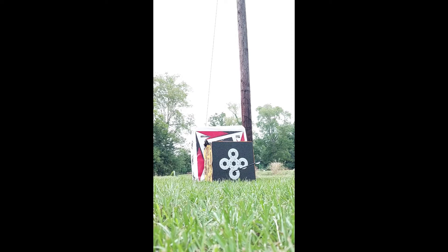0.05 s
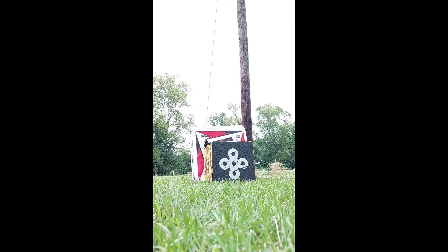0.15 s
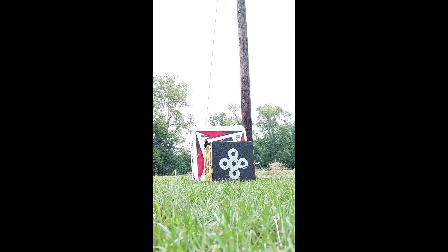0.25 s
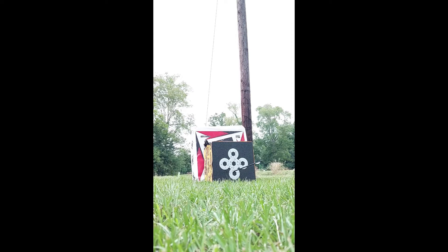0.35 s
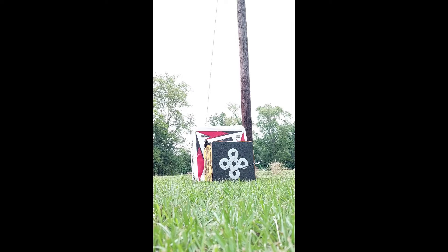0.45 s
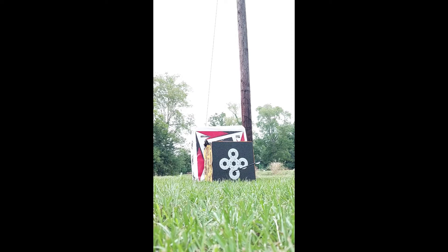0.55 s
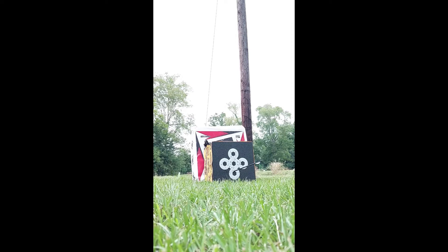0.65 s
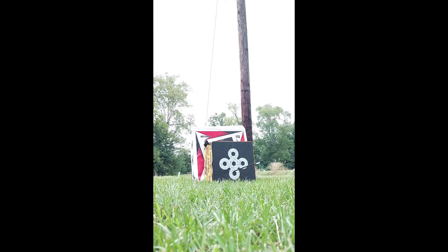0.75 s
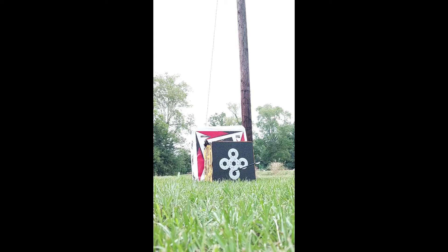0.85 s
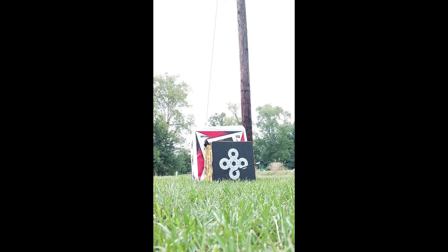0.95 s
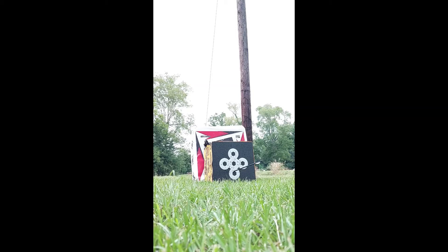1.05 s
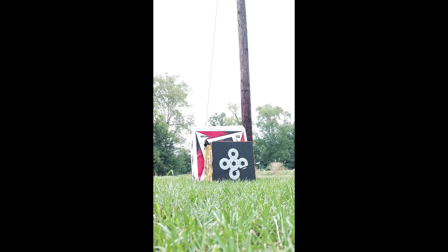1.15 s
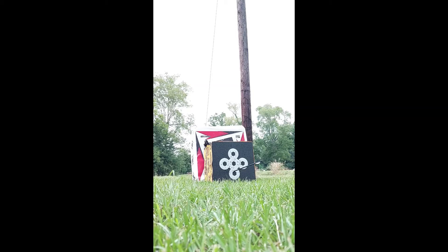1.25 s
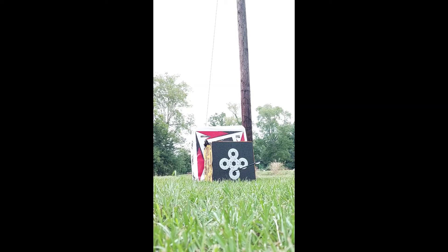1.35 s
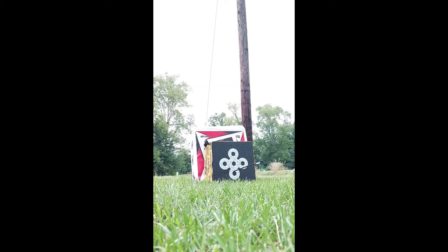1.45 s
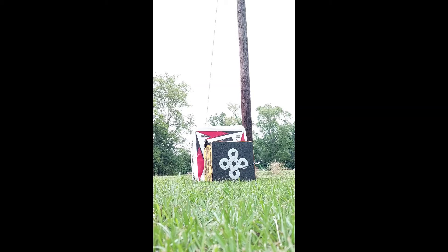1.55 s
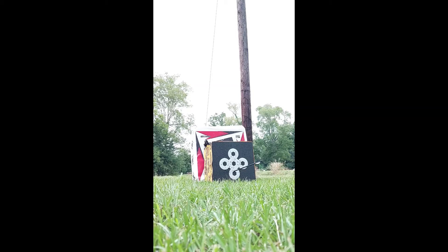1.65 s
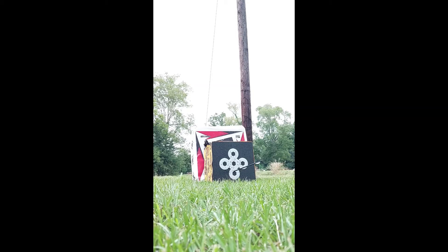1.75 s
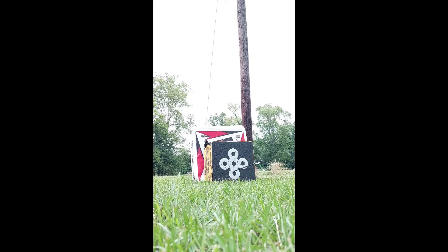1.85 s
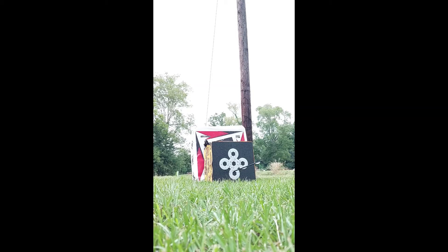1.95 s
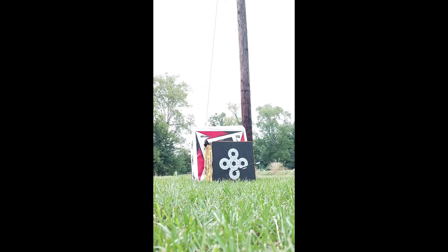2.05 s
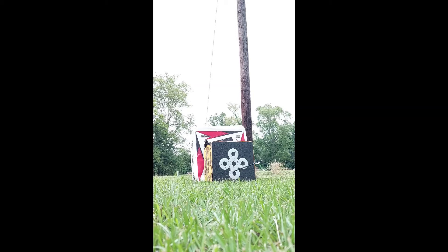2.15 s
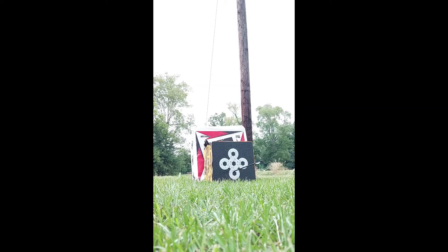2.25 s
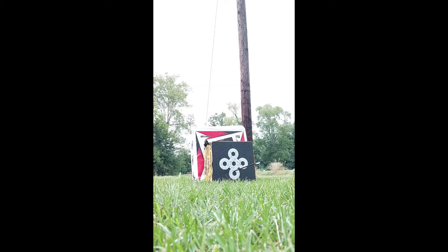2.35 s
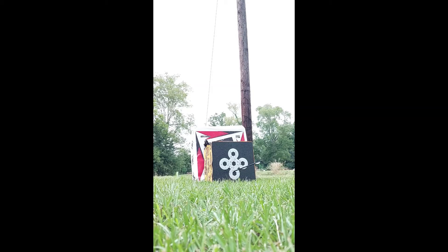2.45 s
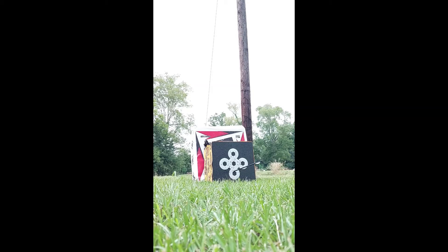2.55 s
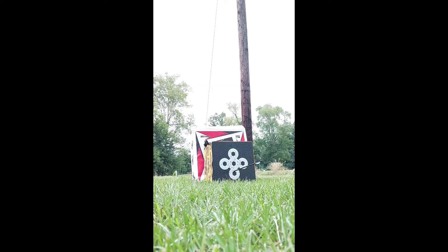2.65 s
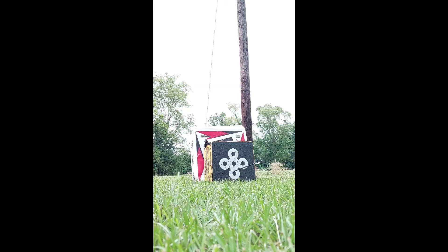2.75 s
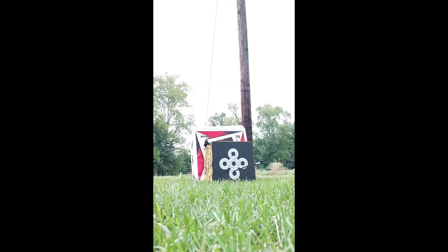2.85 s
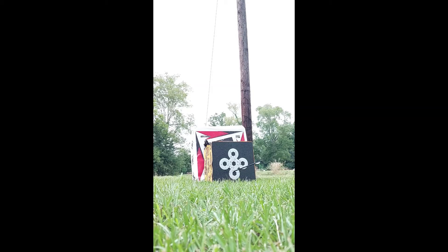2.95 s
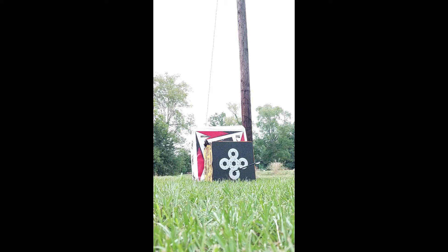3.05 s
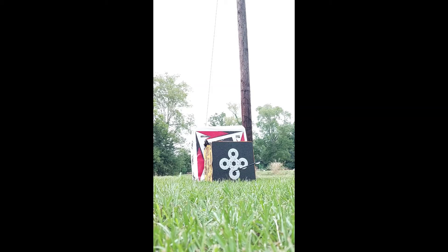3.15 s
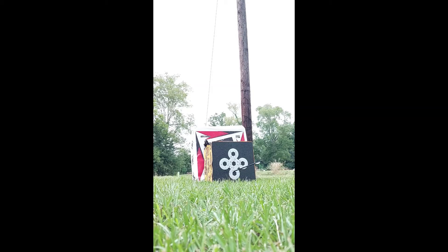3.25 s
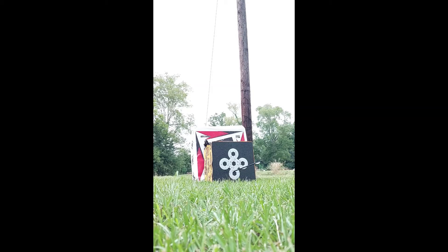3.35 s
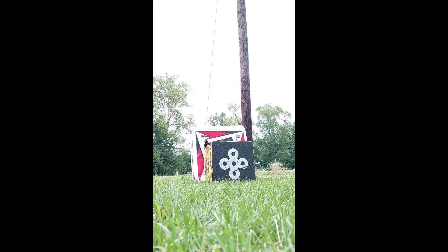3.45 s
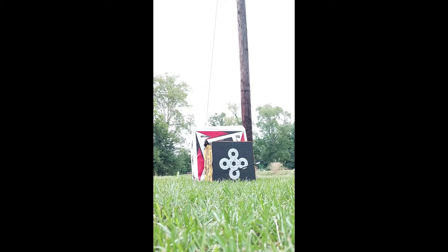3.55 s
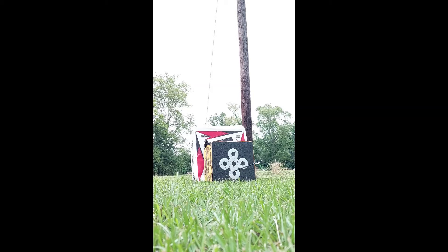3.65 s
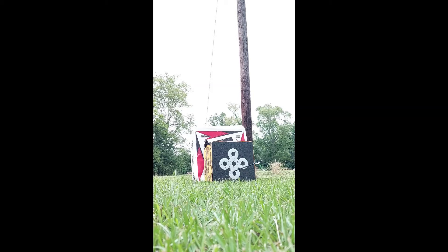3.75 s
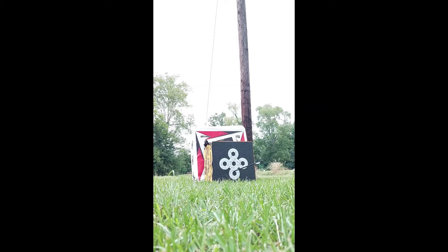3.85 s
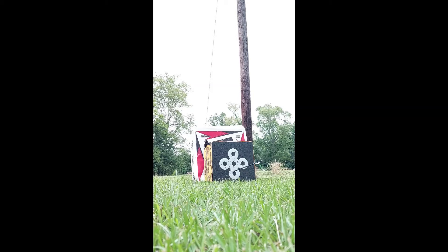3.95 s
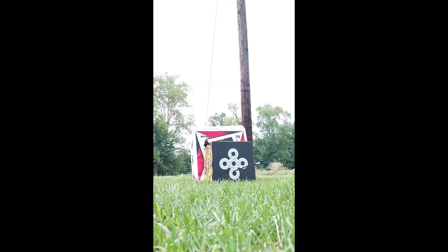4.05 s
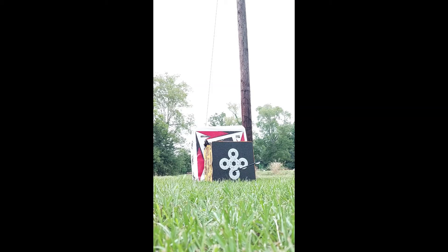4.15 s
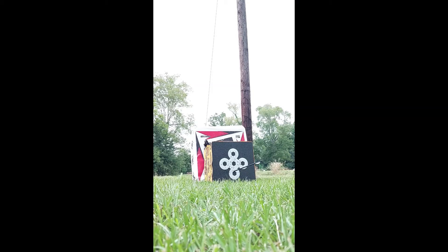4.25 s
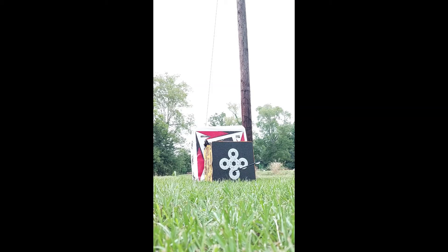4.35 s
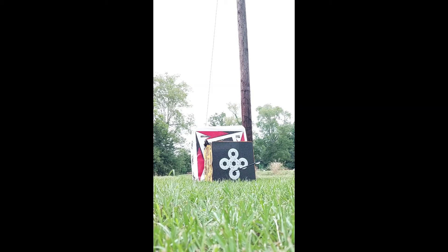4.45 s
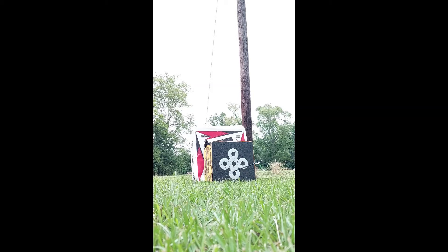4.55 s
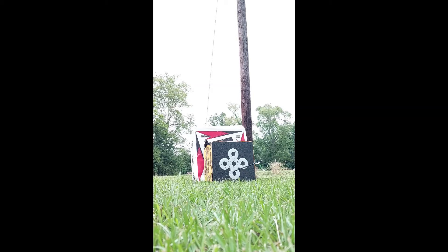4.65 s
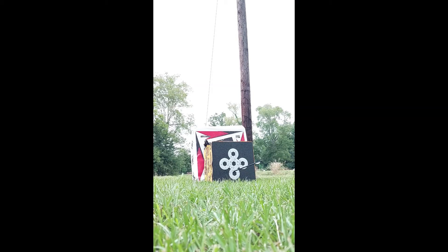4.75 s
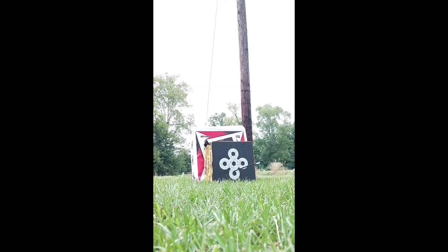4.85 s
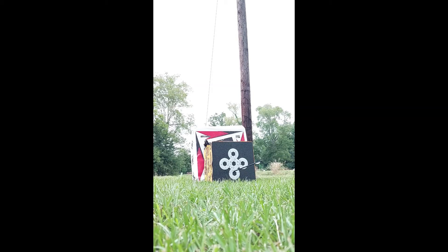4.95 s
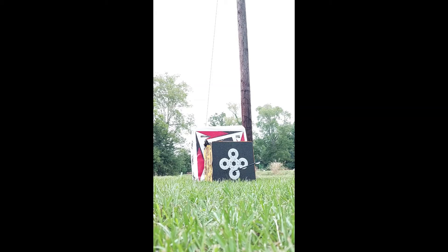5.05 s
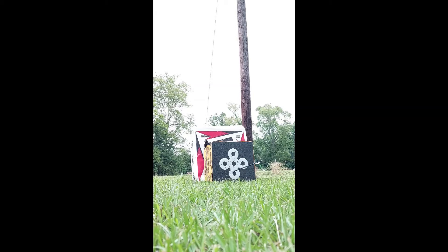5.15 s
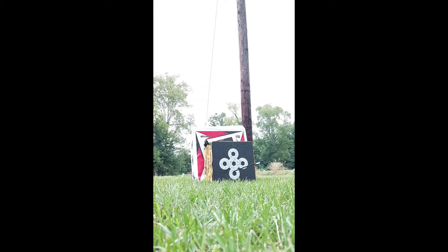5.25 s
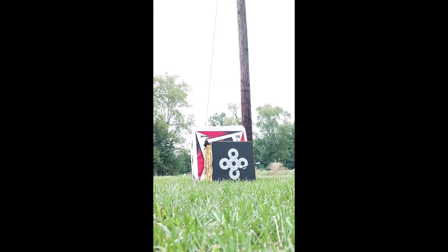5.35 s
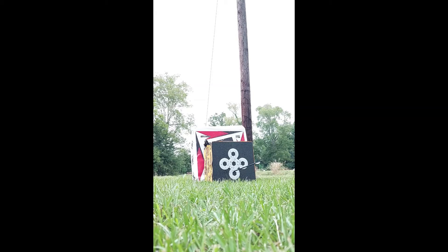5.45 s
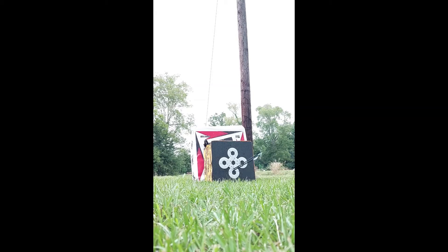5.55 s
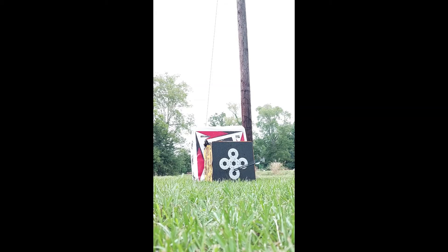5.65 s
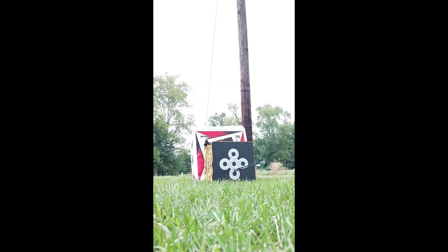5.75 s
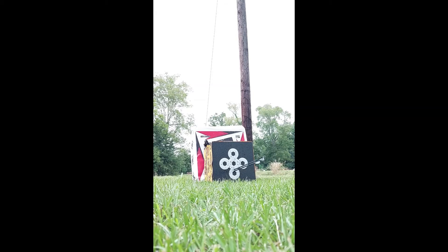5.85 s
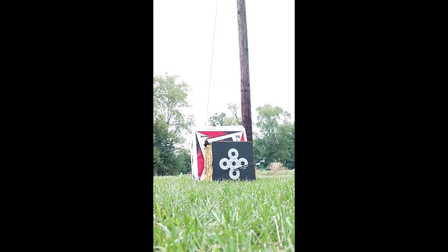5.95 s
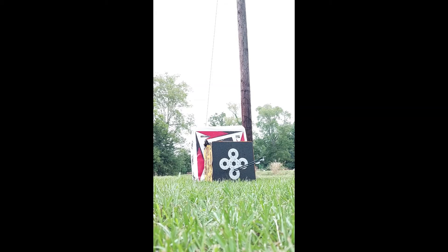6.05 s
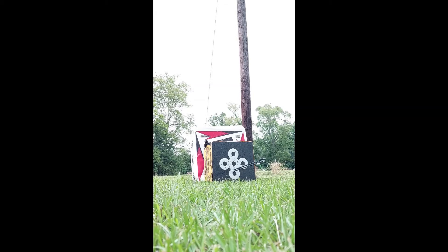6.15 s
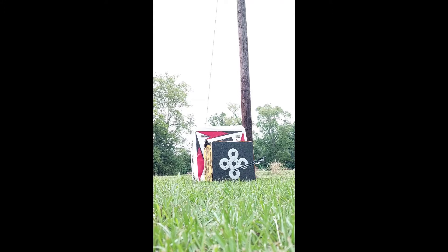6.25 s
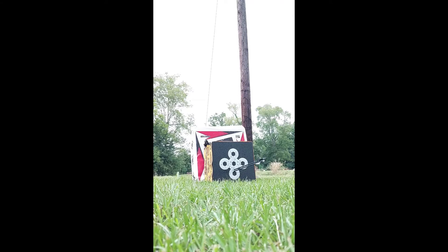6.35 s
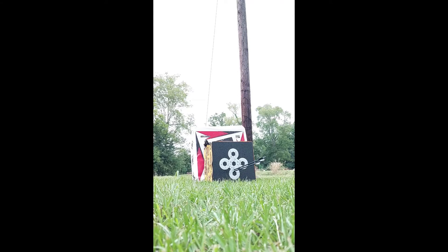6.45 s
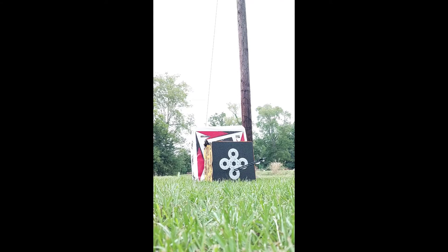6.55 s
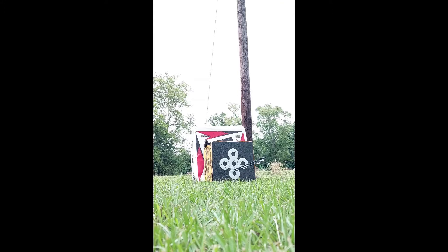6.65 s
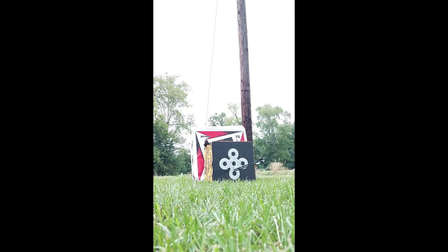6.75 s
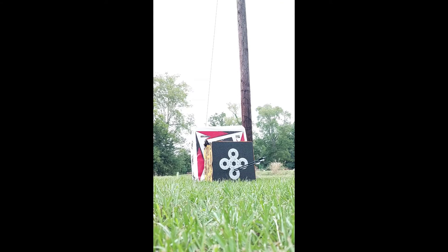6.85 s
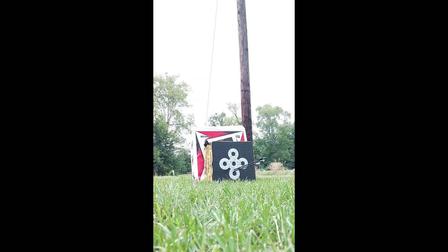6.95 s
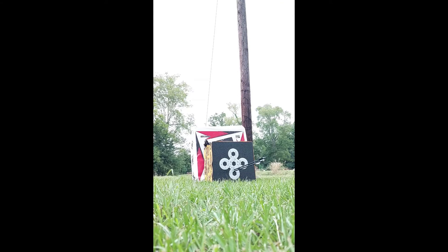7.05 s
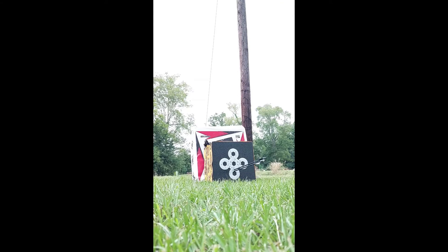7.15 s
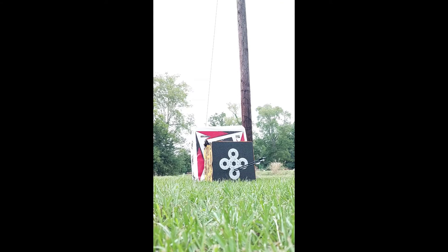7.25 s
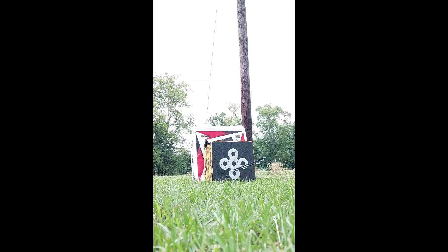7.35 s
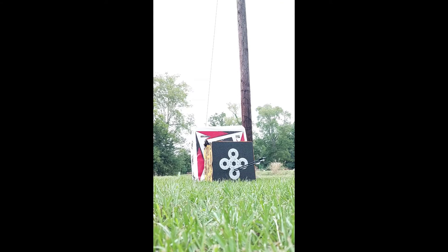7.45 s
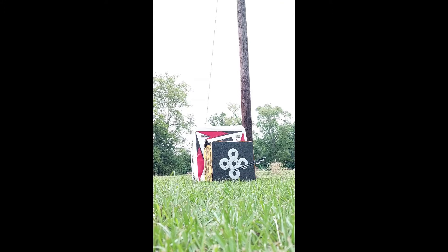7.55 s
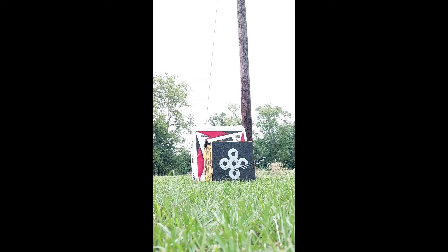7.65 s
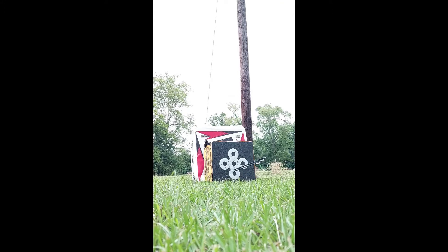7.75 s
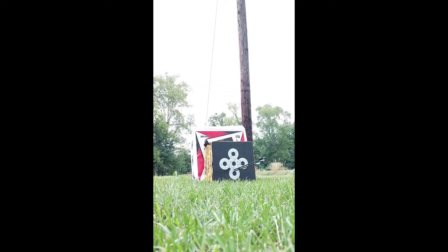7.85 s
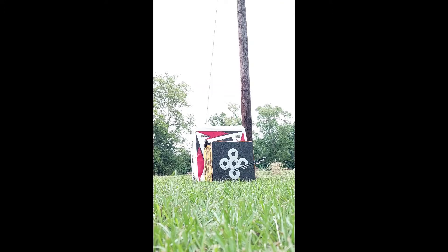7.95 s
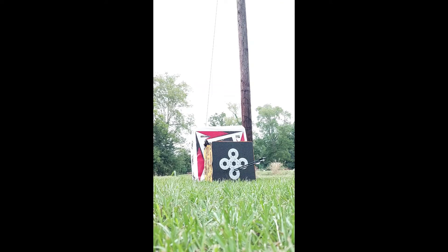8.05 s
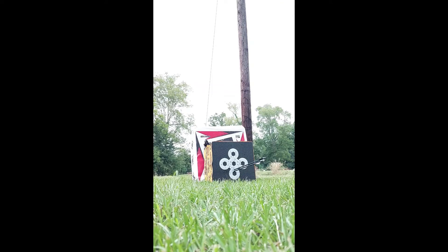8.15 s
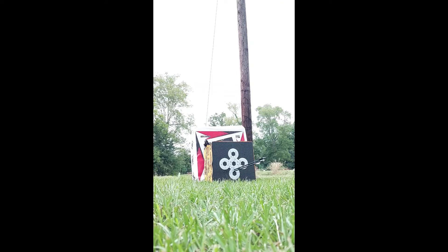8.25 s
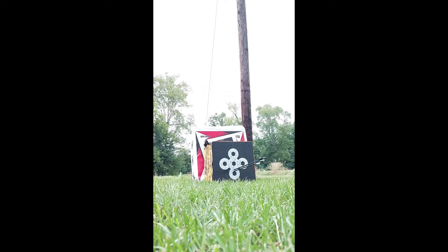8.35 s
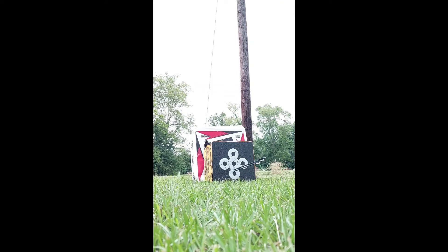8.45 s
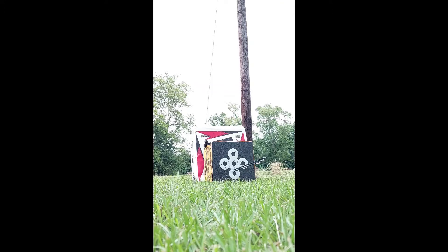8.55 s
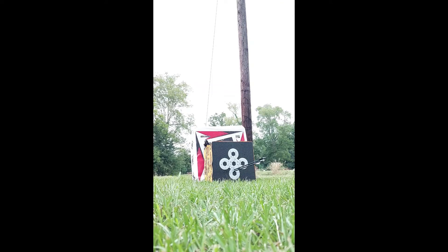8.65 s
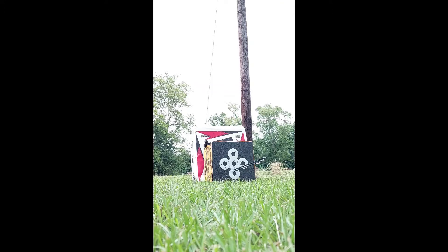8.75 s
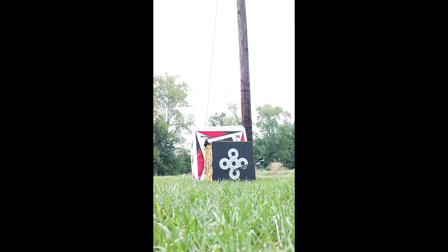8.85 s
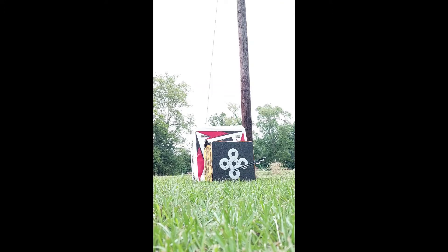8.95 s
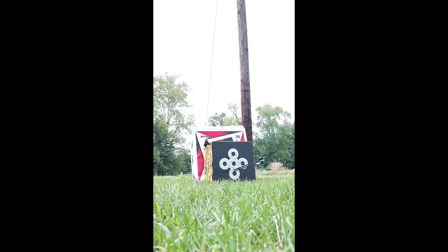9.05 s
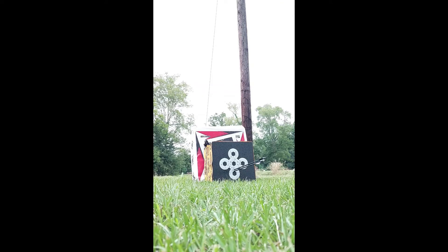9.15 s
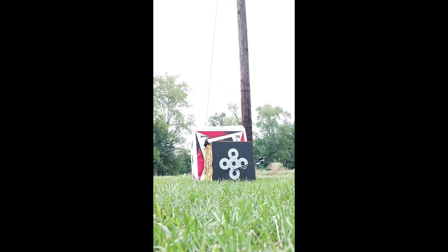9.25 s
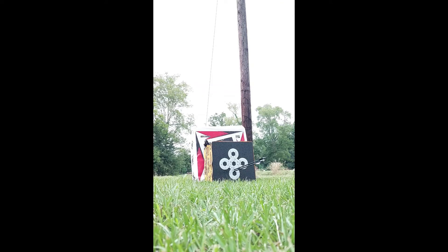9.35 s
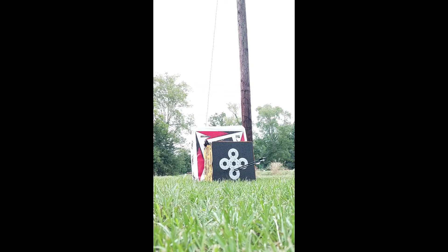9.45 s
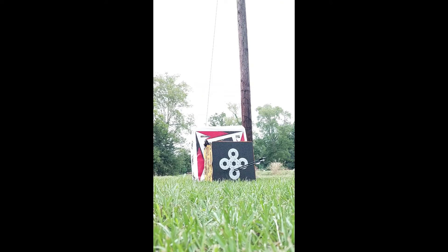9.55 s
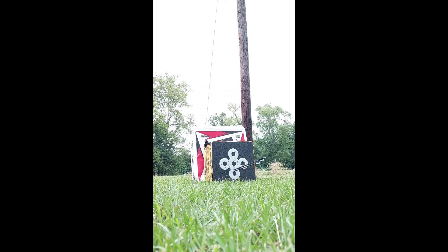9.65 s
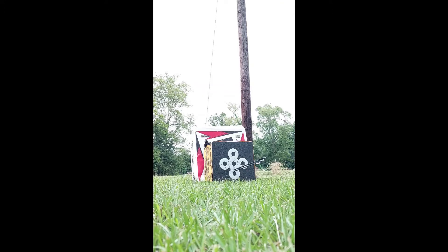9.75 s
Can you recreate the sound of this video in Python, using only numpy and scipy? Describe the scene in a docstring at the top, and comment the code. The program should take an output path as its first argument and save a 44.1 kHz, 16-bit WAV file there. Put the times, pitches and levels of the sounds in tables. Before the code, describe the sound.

A summer lawn, heard by a phone close to a foam target. Throughout, distant machines make a low, slightly throbbing hum and rumble beneath an even, high cicada sizzle, thicker on the left, with wavering insect trills and a faint road to the right. A nearer cicada gives short, buzzy, downward-sliding pulses roughly every second from the start, gradually closer together until about 7; a fainter, farther one answers in the first three seconds. Tiny thin chirps dot the trees. At 2.9 a hoarse, fluttering bird call flicks upward. At 5.36 a soft bowstring puff, then a swift swelling hiss, and at 5.58 one very loud, sharp smack: bright crack, tearing foam, brief hollow thud and faint dull wash. The background instantly ducks, stays low for over a second, then climbs back. The bird calls again at 9.1, followed by two small cicada buzzes from 9.4.

```python
"""Distant machines hum and throb on a summer lawn, under a cicada chorus made of shaped noise and wavering tones.
From the start one nearer cicada buzzes in pulses built from click harmonics; early on, a farther one answers.
A bird gives a hoarse, fluttering call at about 3 s. Then a bowstring puffs and an arrow hisses in as swelling noise.
It smacks into a foam target close to a phone in the grass: dying tones for the block and shaft, noise for the tear.
The phone's gain control ducks everything for more than a second; near the end the bird calls again."""
import sys
import numpy as np
from scipy import signal
from scipy.fft import rfft, irfft, next_fast_len
from scipy.io import wavfile
from scipy.ndimage import uniform_filter1d, minimum_filter1d

SR = 44100
rng = np.random.default_rng(int(sys.argv[2]) if len(sys.argv) > 2 else 0)


def generate_wav(sig):
    """Save sig (samples, or channels by samples) to the path in sys.argv[1] as 16-bit PCM at SR."""
    pcm = np.round(np.clip(np.atleast_2d(sig).T, -1, 1) * 32767).astype(np.int16)
    wavfile.write(sys.argv[1], SR, pcm)


N = 431738
T = np.arange(N) / SR  # time of every sample, in s

# The foam block's ringing tones: pitch_hz, level_db, build_up_s, t60_s (time to fall by 60 dB)
FOAM_TONES = [(189.0, -13.1, 0.0151, 0.0404), (221.5, -22.1, 0.023, 0.1341), (244.4, -3.9, 0.0095, 0.081),
              (269.3, -15.8, 0.0304, 0.18), (282.9, -21.0, 0.033, 0.1612), (311.8, 0, 0.0128, 0.0065),
              (330.2, -12.0, 0.0053, 0.13), (352.4, -4, 0.0217, 0.0108), (382.9, -24.9, 0.0075, 0.1972),
              (434, -21, 0.0026, 0.0284), (617, 3, 0.0011, 0.0042), (830, -4.5, 0.00042, 0.0025)]
# Cracks of the point and shaft going in: pitch_hz, level_db, build_up_s, t60_s, left_minus_right_db
SHAFT_CRACKS = [(980, -12.5, .0007, .008, 3), (2863, -4, 0.00033, 0.0066, 6),
                (4400, -11, 0.00051, 0.003, 12), (5940, -13, .0014, 0.0053, 9.5),
                (6760, -14, .0014, 0.0039, 10.5), (9040, -27, .0005, .0033, 7),
                (10700, -23, 0.00074, 0.003, 10), (12660, -25, .001, .0025, 4)]
# Spectrum of foam tearing and rubbing along the shaft: frequency_hz, relative_level_db
TEAR_SPECTRUM = [(300, -10), (520, -8), (1000, -4), (1450, -19), (2700, -14.5), (4500, -26), (5250, -26),
                 (6400, -23), (8100, -33), (10300, -31), (15000, -33)]
# Buzzes of the nearer cicada, mostly coming sooner and higher:
# start_s, level_db, length_s, click_rate_hz, upper_resonance_db
CICADA_BUZZES = [(-.012, -46, 0.15, 376, 0), (1.022, -44, .14, 377, -11), (2.018, -43, .135, 378, -1),
                 (2.975, -42.5, .12, 378.6, -1), (3.893, -43.5, .135, 381, -3),
                 (4.74, -41.5, .12, 381.9, -5), (5.522, -45, 0.12, 382.5, -4),
                 (6.272, -44.5, .1, 383.3, -10), (7.038, -46, .1, 383, -10), (9.447, -45.5, .065, 390, -10),
                 (9.652, -47, .16, 392, -7)]
# Answers of the farther cicada: middle_s, level_db, half_length_s
CICADA_ANSWERS = [(.32, -57, .13), (1.215, -54, .05), (2.18, -55, .04), (3.11, -54, .04)]
# Harmonics heard in the answers: multiple_of_click_rate, level_db
ANSWER_HARMONICS = [(12, -5), (13, -4), (15, 0)]
# Bird calls: start_s, level_db, lower_harmonic_db, effort_outside_accent (share)
BIRD_CALLS = [(2.915, -51, -7, .9), (9.136, -45, -9, .55)]
# Short thin notes in the trees: middle_s, centre_hz, level_db, half_length_s, rise (share of pitch per s)
THIN_NOTES = [(1.0, 8250, -52.5, .015, 4), (1.24, 9800, -59, .015, 2), (2.19, 8060, -59, .015, 3),
              (3.02, 7600, -57, .015, 3), (5.11, 6800, -54, .015, 3), (7.59, 3670, -54, .035, -0.5),
              (7.818, 3900, -54, .025, 0), (8.165, 3670, -52, .03, 0.3), (9.475, 3130, -54, .022, 0),
              (9.532, 2750, -57, .025, 0), (9.583, 3310, -53, .025, 0)]
# Spectrum of the many cicadas in the trees: frequency_hz, relative_level_db
CHORUS_SPECTRUM = [(1000, -17.5), (1750, -23), (2450, -16), (2950, -4.5), (4000, -1.5), (4950, 2),
                   (5600, -2.5), (6900, -10), (8000, -19), (9000, -24.5), (10100, -18.5), (11500, -28.5),
                   (15500, -31.5)]
# Single insects trilling within the chorus: pitch_hz, level_db (before swells and fade)
INSECT_TRILLS = [(3420, -64), (4130, -63), (4387, -60.5), (4505, -67), (4904, -54), (5130, -61),
                 (5819, -64), (6298, -60.5), (6622, -68)]
# Tones of distant machines, close pairs throb: pitch_hz, starting_level_db
MACHINE_TONES = [(58.7, -44), (64.6, -45), (76.7, -47), (101, -48.5), (128.9, -49.5), (157.2, -54),
                 (232.2, -58), (239, -56.5), (293, -57), (349.5, -61.5)]
# Spectrum of distant traffic and machinery: frequency_hz, relative_level_db
RUMBLE_SPECTRUM = [(20, -27), (38, -6), (52, -4.5), (100, 0.5), (150, 1.5), (190, -6), (240, -2.5),
                   (330, -10.5), (480, -12.5), (720, -17.5), (1000, -32), (1500, -48), (3000, -52.5)]
# Spectrum of a road far off to the right: frequency_hz, relative_level_db
ROAD_SPECTRUM = [(500, -9.5), (800, 1.5), (1150, -3), (1500, -18), (2500, -26)]

# The shot: the arrow leaves, passes the phone and hits
RELEASE_S, PASSES_S, IMPACT_S = 5.36, 5.549, 5.5759
CLOSING_S = .021  # how quickly the hiss swells around the pass
# The shaft squeaks lower as it slows in the foam
SKID_FROM_HZ, SKID_TO_HZ, SKID_SLOWING_S, SKID_DB = 5200, 2080, .0026, -22
GRASS_DIP_HZ, GRASS_DIP_WIDTH_HZ, GRASS_DIP_DB = 1570, 470, -8

# Nearer cicada: two resonances slide down (from, to); the lower one weakens as the cicada winds up
UPPER_SLIDE_HZ, LOWER_SLIDE_HZ, SLIDE_WIDTH_HZ = (4200, 3350), (3400, 3020), 200
LOWER_SLIDE_DB, LOWER_FADE_DB_PER_S = -3, .9
# The leaves scatter a hiss around each buzz
BUZZ_HISS_DB, BUZZ_HISS_S, BUZZ_HISS_FADE_DB_PER_S = -7, 0.19, 1
ANSWER_HZ = 271.5  # click rate of the farther cicada

# Bird call: basic pitch, length and edges; loud accent; flutter; upward flick at the end (share of pitch)
CALL_HZ, CALL_S, CALL_ATTACK_S, CALL_RELEASE_S = 714, .308, .022, .006
ACCENT_AT_S, ACCENT_S = .13, .03
FLUTTER_HZ, FLUTTER_DEPTH = 15.5, .52
FLICK_S, FLICK_RISE = .028, .22

# Background: levels and slow fades
CHORUS_DB, CHORUS_FADE_DB_PER_S, TRILL_FADE_DB_PER_S = -45, 0.1553, .5
HUM_WANDER, BASS_FADE_DB_PER_S = 0.002497, 0.6  # share of each pitch; the lowest tone fades most
ROAD_DB = -68

PORT_LAG_S = 0.00027  # delay from the left microphone port to the right one
TOP_HZ = 15750  # the phone cuts everything above this


def undb(db):
    """Turn decibels into gain."""
    return 10 ** (np.asarray(db) / 20)


def unit(x):
    """Scale to an rms (average strength) of 1."""
    return x / np.sqrt(np.mean(x ** 2))


def pan(db):
    """Give left and right gains for a left-minus-right level difference."""
    return undb(np.array([[db], [-db]]) / 2)


def walk(rate):
    """Wander smoothly by chance, with about rate turns a second and a spread near 1."""
    k = int(SR / rate)
    steps = np.repeat(rng.standard_normal(N // k + 1), k)
    return uniform_filter1d(steps, k)[:N]


def noise(points):
    """Make noise of rms 1 whose spectrum follows (Hz, dB) points."""
    hz, db = np.transpose(points)
    size = next_fast_len(N)
    f = np.maximum(np.fft.rfftfreq(size, 1 / SR), 1)
    gain = undb(np.interp(np.log(f), np.log(hz), db))
    gain = gain * np.minimum(f / hz[0], 1) ** 2  # falls away below the first point
    return unit(irfft(rfft(rng.standard_normal(size)) * gain)[:N])


def wide(points, side_db):
    """Make stereo noise from a shared part and a part that is opposite in left and right."""
    shared = noise(points)
    opposed = noise(points) * np.array([[1], [-1]])
    return unit(shared + undb(side_db) * opposed)


def burst(t, rise, t60):
    """Build up from t = 0, then die away by 60 dB every t60 seconds."""
    build_up = np.clip(t / rise, 0, 1) ** 2
    return build_up * np.exp(-np.log(1000) * np.maximum(t - rise, 0) / t60)


def sideways(x):
    """Sound from the left reaches the right port a little later."""
    return np.array([x, np.interp(T - PORT_LAG_S, T, x)])


def trees(x, t60, wet_db):
    """Leaves and trunks scatter a diffuse tail, different at each port."""
    t = T[:SR // 2]
    tail = rng.standard_normal((2, len(t))) * np.exp(-np.log(1000) * t / t60)
    tail /= np.sqrt(np.sum(tail ** 2, axis=1, keepdims=True))
    scattered = signal.fftconvolve(x[None], tail, axes=1)[:, :N]
    return sideways(x) + undb(wet_db) * scattered


def impact():
    """The point cracks through the face, the shaft rubs to a stop and the block booms."""
    since_hit = T - IMPACT_S
    span = (T >= IMPACT_S) & (T < IMPACT_S + 1)
    t = T[span] - T[span][0]
    boom = 0
    for hz, db, rise, t60 in FOAM_TONES:
        boom = boom - undb(db) * np.sin(2 * np.pi * hz * t) * burst(t, rise, t60)
    crack = 0
    for hz, db, rise, t60, side_db in SHAFT_CRACKS:
        crack = crack + undb(db) * pan(side_db) * np.sin(2 * np.pi * hz * t) * burst(t, rise, t60)
    skid_hz = SKID_TO_HZ + (SKID_FROM_HZ - SKID_TO_HZ) * np.exp(-t / SKID_SLOWING_S)
    skid_phase = 2 * np.pi * np.cumsum(skid_hz) / SR
    skid = undb(SKID_DB) * np.sin(skid_phase) * burst(t, rise=.003, t60=.03)
    out = wide(TEAR_SPECTRUM, side_db=-1.5) * undb(-15.5) * burst(since_hit, rise=.0007, t60=0.043)
    out[:, span] += boom + crack + skid
    # the block's many weaker modes blur into a short hollow rattle
    rattle = wide([(260, -2), (420, 6), (560, -1), (850, -12), (1400, -38)], side_db=1)
    out += rattle * undb(-23.0) * burst(since_hit, rise=0.014, t60=0.14)
    # the tree line returns a faint, dull wash
    wash = wide([(150, -3), (270, 1.5), (400, -4), (950, -15), (1500, -22), (2900, -11.5),
                 (6000, -29), (15000, -38)], side_db=-3.0)
    return out + wash * undb(-35.5) * burst(since_hit, rise=0.022, t60=0.64)


def over_grass(x):
    """The bounce off the lawn weakens a band in the middle of the spectrum."""
    sharpness = GRASS_DIP_HZ / GRASS_DIP_WIDTH_HZ
    notched = signal.lfilter(*signal.iirnotch(GRASS_DIP_HZ, sharpness, fs=SR), x)
    return notched + undb(GRASS_DIP_DB) * (x - notched)


def flight():
    """The far bowstring gives a soft puff; the vanes hiss, loudest as the arrow passes the phone."""
    string = wide([(150, -8), (350, 0), (700, -9), (1200, -22), (1700, -25), (3000, -24),
                   (14000, -36.5)], side_db=-4)
    puff = burst(T - RELEASE_S, rise=.007, t60=.27)
    vanes = wide([(500, -3), (2000, -5), (4200, 9), (8000, -1), (15000, -10)], side_db=2.5)
    in_flight = (T > RELEASE_S) & (T < IMPACT_S)
    closing = in_flight / np.hypot(1, (T - PASSES_S) / CLOSING_S) ** 2
    return undb(-40.0) * string * puff + undb(-42.5) * vanes * closing * pan(3)


def cicada(body_hz=4185, body_width_hz=150):
    """Tymbal (drum skin) clicks excite one fixed and two sliding resonances, in a swell of hiss."""
    out, swell = np.zeros(N), np.zeros(N)
    for start, db, length, hz, upper_db in CICADA_BUZZES:
        span = (T > start) & (T < start + length)
        u = (T[span] - start) / length  # 0 to 1 through the buzz
        phase = 2 * np.pi * np.cumsum(hz * (1 + .001 * walk(120)[span])) / SR
        gate = np.clip(np.minimum(u / .15, (1 - u) / .3), 0, 1)
        body = np.interp(u, [.4, 1], [1, .15])
        upper_hz = np.interp(u, [0, .85], UPPER_SLIDE_HZ)
        lower_hz = np.interp(u, [.05, .45], LOWER_SLIDE_HZ)
        lower_db = LOWER_SLIDE_DB - LOWER_FADE_DB_PER_S * start
        for k in np.arange(8, 14):  # harmonics of the click rate
            gain = body / (1 + ((k * hz - body_hz) / body_width_hz) ** 4)
            for centre, slide_db in ((upper_hz, upper_db), (lower_hz, lower_db)):
                slide = undb(slide_db) / (1 + ((k * hz - centre) / SLIDE_WIDTH_HZ) ** 2)
                gain = np.hypot(gain, slide)
            shiver_db = 1.5 * np.interp(u, np.linspace(0, 1, 5), rng.standard_normal(5))
            tone = np.sin(k * phase + rng.uniform(0, 2 * np.pi))
            out[span] += undb(db + shiver_db) * gate * gain * tone
        hiss_db = db + BUZZ_HISS_DB - BUZZ_HISS_FADE_DB_PER_S * start
        swell += undb(hiss_db) * np.exp(-((T - start - .09) / BUZZ_HISS_S) ** 2)
    scattered = trees(out, t60=.65, wet_db=-8)
    hiss = wide([(2400, -20), (3000, 4), (4300, 7), (5500, -8), (8500, -31), (15000, -43)], side_db=-7)
    return (scattered + swell * hiss) * pan(1.4)


def far_cicada():
    """A slower tymbal answers from deeper in the trees, in faint, wavering lines."""
    phase = 2 * np.pi * np.cumsum(ANSWER_HZ * (1 + .003 * walk(90))) / SR
    voice = sum(undb(db) * np.sin(k * phase) for k, db in ANSWER_HARMONICS)
    level = sum(undb(db) * np.exp(-((T - middle) / half) ** 4) for middle, db, half in CICADA_ANSWERS)
    return trees(voice * level, t60=.4, wet_db=-7) * pan(1.4)


def bird_calls(fall=0.07):
    """Third and fourth harmonics carry a hoarse call that flutters, sags, frays and flicks up."""
    out = np.zeros(N)
    for start, db, lower_db, hold in BIRD_CALLS:
        t = T - start
        u = np.clip(t / CALL_S, 0, 1)  # 0 to 1 through the call
        gate = np.clip(np.minimum(t / CALL_ATTACK_S, (CALL_S - t) / CALL_RELEASE_S), 0, 1)
        accent = np.exp(-((t - ACCENT_AT_S) / ACCENT_S) ** 2)
        effort = gate * (hold + (1 - hold) * accent)
        flutter = 1 - FLUTTER_DEPTH * np.sin(np.pi * FLUTTER_HZ * (t - ACCENT_AT_S)) ** 4
        flick = np.clip(2 * (t - CALL_S + FLICK_S) / FLICK_S, 0, 1)
        # the note is clearest where it is loudest and frays as it goes on
        fray = .045 * (1 - .75 * accent) * (.55 + .7 * u) * (1 - .6 * flick)
        hoarse = fray * walk(650) + .008 * walk(40)
        pitch_hz = CALL_HZ * (1 - fall * u ** 2 + FLICK_RISE * flick + hoarse)
        phase = 2 * np.pi * np.cumsum(pitch_hz) / SR
        # the upper harmonic weakens as the lower one grows
        lower = undb(lower_db) * (1 + .7 * u ** 3 + 1.6 * flick) * np.sin(3 * phase)
        upper = (1 - .3 * u ** 3) * np.sin(4 * phase)
        rough_db = 4 * (1 - .7 * accent) * np.tanh(walk(110))
        out += undb(db + rough_db) * effort * flutter * (lower + upper)
    return out


def thin_notes():
    """Short pure tones with soft edges; the steeper the slide in pitch, the more they rasp."""
    out = np.zeros(N)
    rasp = 0.052 * walk(2500)
    for middle, hz, db, half_length, rise in THIN_NOTES:
        span = np.abs(T - middle) < .1
        t = T[span] - middle
        phase = 2 * np.pi * np.cumsum(hz * (1 + rise * (t + rasp[span] / 3))) / SR
        out[span] += undb(db) * np.exp(-(t / half_length) ** 2) * np.sin(phase)
    return out


def birds():
    """The calls and thin notes scatter among the trees, toward the left."""
    return trees(bird_calls() + thin_notes(), t60=.25, wet_db=-8) * pan(5.5)


def chorus():
    """Many far cicadas merge into an even, high sizzle, thickest on the left, easing very slightly."""
    level_db = CHORUS_DB - CHORUS_FADE_DB_PER_S * T + 0.58 * walk(16)
    sizzle = sideways(noise(CHORUS_SPECTRUM)) + undb(5) * wide(CHORUS_SPECTRUM, side_db=0.15)
    return unit(sizzle) * undb(level_db) * pan(3.9)


def trills(swell_db=4, stray_hz=16):
    """Narrow, shivering notes come and go and slowly die down."""
    out = 0
    for hz, db in INSECT_TRILLS:
        phase = 2 * np.pi * np.cumsum(hz + stray_hz * walk(150)) / SR
        level_db = db + swell_db * np.tanh(walk(7.6)) + 1.9 * walk(60)
        out = out + undb(level_db) * np.sin(phase)
    return sideways(out) * undb(-TRILL_FADE_DB_PER_S * T) * pan(1.7)


def machines():
    """Slightly wandering tones over a low rumble, nearly alike at both ports; a faint road to the right."""
    tones = 0
    lowest_hz = MACHINE_TONES[0][0]
    for hz, db in MACHINE_TONES:
        fade_db = BASS_FADE_DB_PER_S * (lowest_hz / hz) ** 2 * T
        phase = 2 * np.pi * np.cumsum(hz * (1 + HUM_WANDER * walk(1.5))) / SR
        tones = tones + undb(db - fade_db) * np.sqrt(2) * np.sin(phase)
    waver_db = .9 * walk(7)
    rumble = wide(RUMBLE_SPECTRUM, side_db=-13) * undb(-43.0 + waver_db)
    road = undb(ROAD_DB) * noise(ROAD_SPECTRUM)
    return tones + rumble * pan(-0.41) + road * pan(-17)


def scene():
    """Add up the shot, the cicadas and bird, and the background of the lawn."""
    shot = over_grass(impact()) + flight()
    animals = cicada() + far_cicada() + birds()
    background = chorus() + trills() + machines()
    return shot + animals + background


def gain_control(x, ceiling_db=-1.5, hold_s=1.105, recover_db_per_s=13):
    """A peak over the ceiling pulls the gain down at once; it holds, then climbs back."""
    peak_db = 20 * np.log10(np.abs(x).max(axis=0) + 1e-9)
    over_db = np.maximum(peak_db - ceiling_db, 0)
    hold = int(hold_s * SR) // 2 * 2 + 1
    # keep the largest overshoot of the last hold_s seconds
    held_db = -minimum_filter1d(-over_db, hold, origin=hold // 2, mode="constant")
    recovery_db = recover_db_per_s * T
    cut_db = np.maximum.accumulate(held_db + recovery_db) - recovery_db
    look_ahead = 88  # samples: the cut starts just before the peak
    return x * undb(-uniform_filter1d(np.roll(cut_db, -look_ahead), look_ahead))


def record(dry):
    """The phone rides its gain and cuts the top."""
    top_cut = signal.ellip(8, .2, 70, TOP_HZ, fs=SR, output="sos")
    return signal.sosfilt(top_cut, gain_control(dry))


dry = scene()
out = record(dry)
generate_wav(out)
```